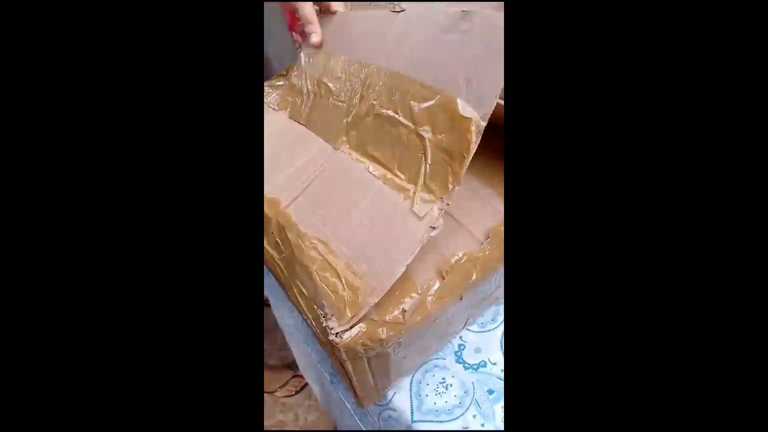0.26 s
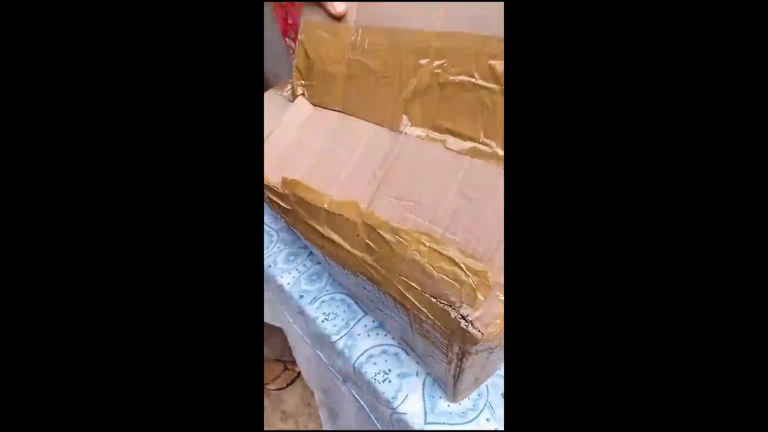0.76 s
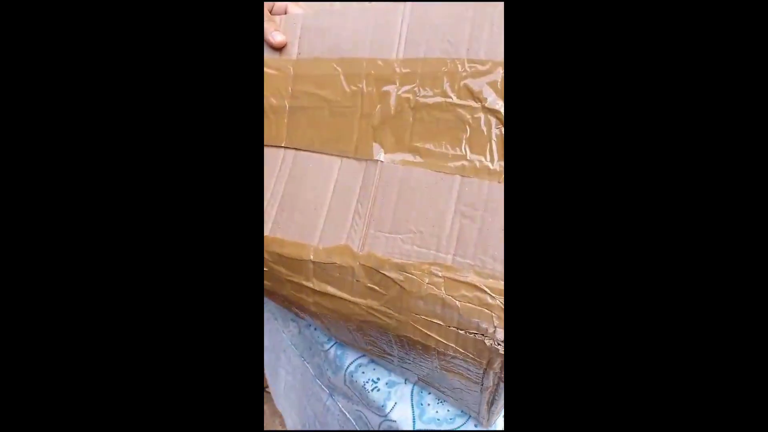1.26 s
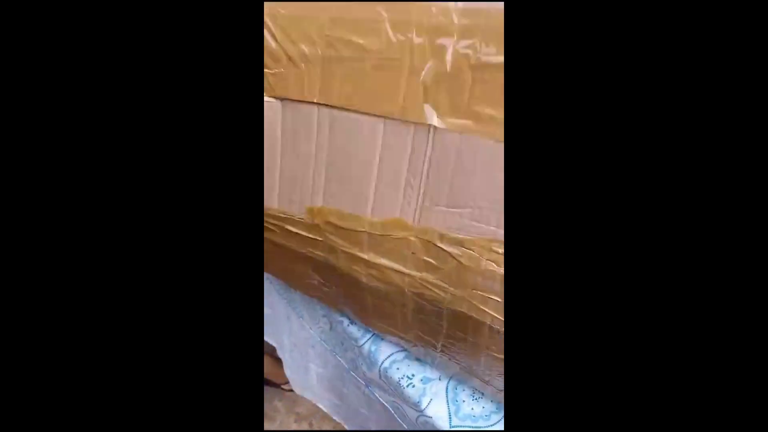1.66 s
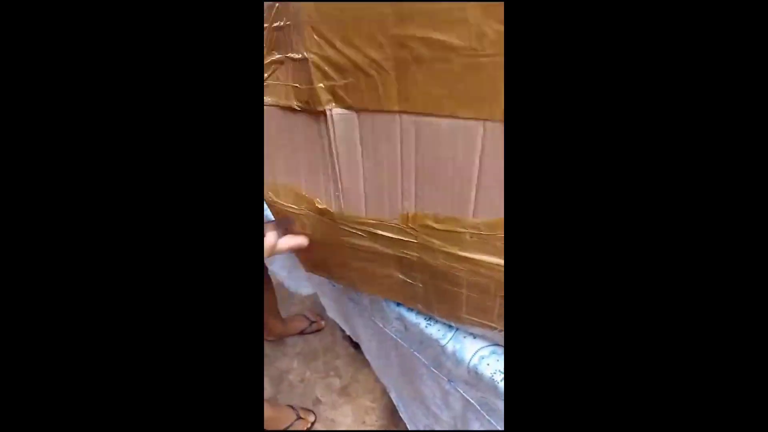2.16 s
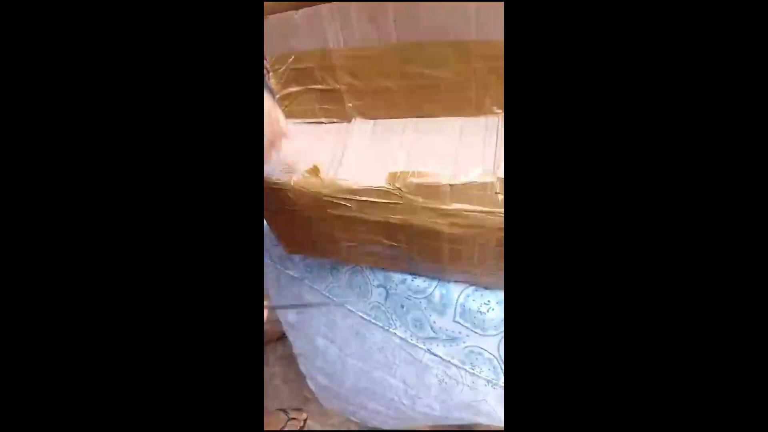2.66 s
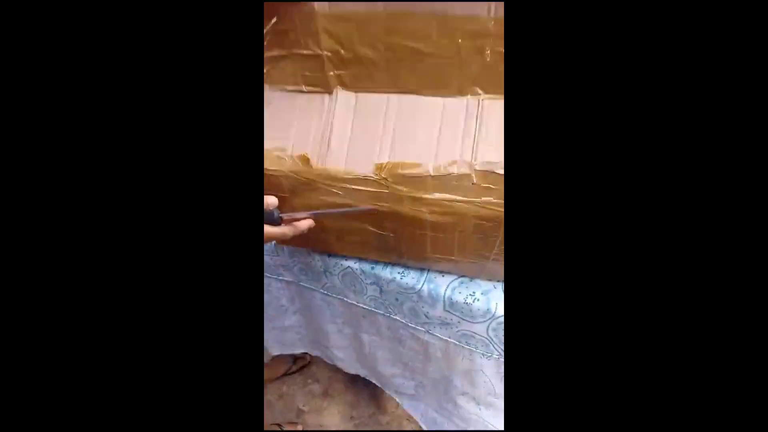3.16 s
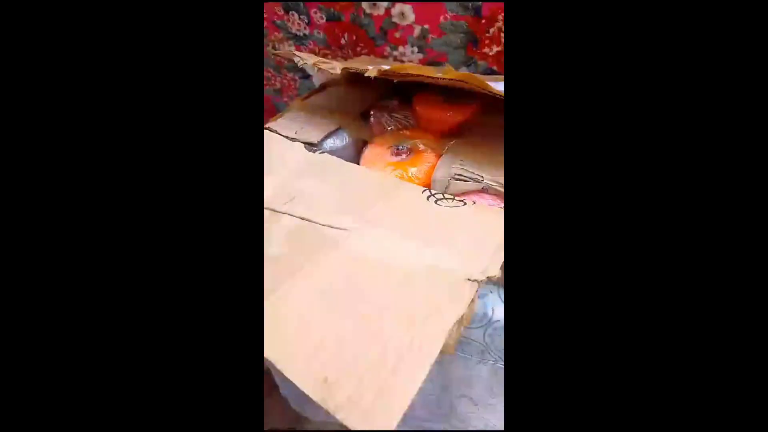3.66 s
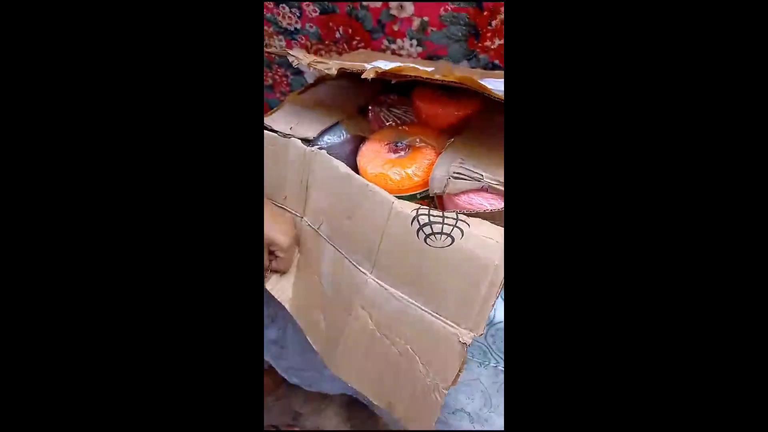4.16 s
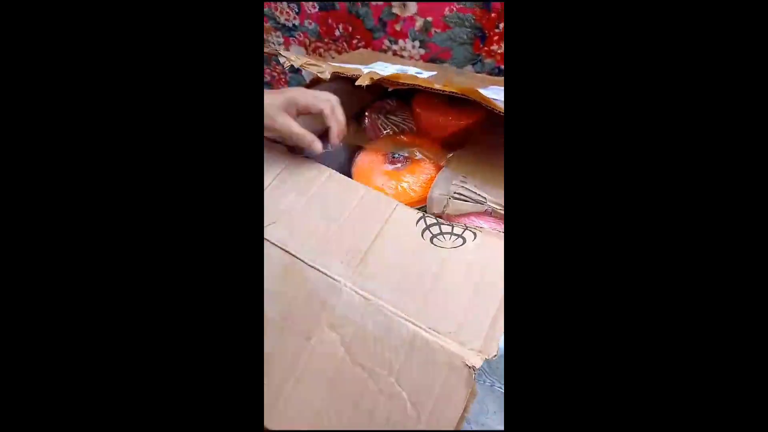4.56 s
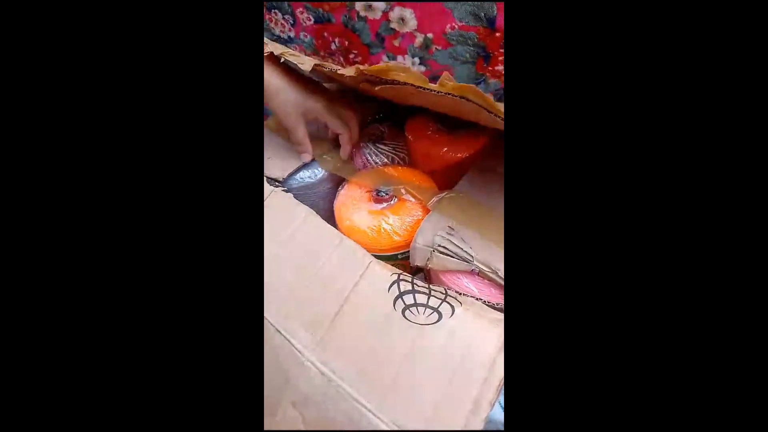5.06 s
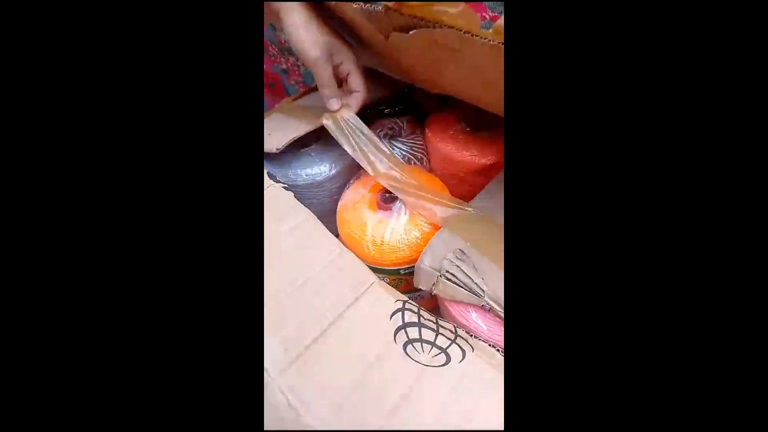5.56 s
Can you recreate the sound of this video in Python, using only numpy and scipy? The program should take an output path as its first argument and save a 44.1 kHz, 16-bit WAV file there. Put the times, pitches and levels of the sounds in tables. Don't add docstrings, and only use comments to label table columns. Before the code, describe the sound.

Close single microphone in a small furnished room: hands fold back taped cardboard flaps. Film hisses and crinkles at once, tape snaps sharply, and the hollow box knocks and rumbles on a table. After a quiet rub, another crackling burst comes, then lighter crinkles and bumps as the flaps open. Soft picking at plastic wrap leads to a loud, rapid rip of tape near the end.

```python
import sys
import numpy as np
from scipy import signal
from scipy.fft import rfft, irfft
from scipy.io import wavfile
from scipy.ndimage import uniform_filter1d

SR = 44100
rng = np.random.default_rng(int(sys.argv[2]) if len(sys.argv) > 2 else 0)


def boost_factor(decibels):
    exponent = np.asarray(decibels, float) / 20
    return 10 ** exponent


def to_wav(sig):
    pcm = np.clip(np.atleast_2d(sig), -1, 1) * 32767
    pcm = np.round(pcm).astype(np.int16)
    wavfile.write(sys.argv[1], SR, pcm.T)


N = 256216

# (frequency [Hz], density [dB per Hz])
HUSH = [(18, -45), (30, -20), (149, -29), (280, 16), (426, -5), (649, -5), (1910, 0), (8980, -19),
        (16000, -22)]
# (frequency [Hz], density [dB per Hz])
TABLE = [(15, -56.5), (25, -12.5), (59, -8), (102, 1.5), (150, -3), (200, -67.5), (330, -120)]
# (frequency [Hz], density [dB per Hz])
CARD = [(88, -68), (150, -18), (302, 4.5), (487, -1), (742, 1), (982, -3), (1150, -5.5), (1400, -17),
        (1820, -69), (3080, -120)]
# (frequency [Hz], density [dB per Hz])
TAPE = [(820, -51), (1400, -11.5), (1620, -9.5), (1970, -10), (2240, -5.5), (2730, -10.5), (2990, -5.5),
        (3470, -8), (3830, -2.5), (5170, -0.5), (5900, -2), (7670, -29.5), (13000, -120)]
# (frequency [Hz], density [dB per Hz])
FILM = [(3470, -44), (5900, -2), (6690, 7.5), (8520, 8.5), (11500, 2.5), (14900, 2), (16000, -4)]
# (frequency [Hz], density [dB per Hz])
CRUNCH = [(700, -30), (1300, -0.5), (2300, -1.5), (4000, -4.5), (6000, -7.5), (8500, -40)]
# (frequency [Hz], level [dB], t60 [s])
BOX = [(290, -12.5, 0.13), (541, -1.5, 0.033), (785, 4.5, 0.051), (1029, -15, 0.0099)]
# (time [s], length [s], extra shake [dB])
SHOVES = [
    (.47, 0.056, 21),
    (0.995, 0.26, 15.5),
    (1.46, 0.51, 9),
    (2.619, 0.12, 13.5),
    (3.08, 1, 10),
    (4.053, 0.085, 8),
    (4.284, 0.09, 11),
    (4.604, 0.17, 2.5),
]
# (time [s], length [s], peak level [dB])
SCRAPES = [
    (0.1, 0.25, -42),
    (0.607, .13, -35),
    (4.0, 0.1, -28.5),
    (1.7, 0.2, -36),
    (5.04, 0.4, -53),
]
# (time [s], length [s], peak level [dB], frequency [Hz])
SQUEAKS = [
    (.11, 0.077, -29.5, 2550),
    (.775, .035, -22.5, 9050),
    (0.927, .09, -49, 1580),
    (0.918, 0.089, -54, 2520),
    (1.973, 0.026, -21, 6500),
    (3.412, 0.094, -46, 1160),
]
# (time [s], peak level [dB], panel frequency [Hz], t60 [s])
KNOCKS = [(.046, -29.5, 740, 0.047), (.164, -24.5, 397, 0.022), (.212, -19, 350, 0.16),
          (0.23, -22, 295, 0.23), (0.244, -17.5, 339, 0.05), (0.467, -35.5, 316, 0.044),
          (.513, -20, 221, 0.024), (0.636, -23, 333, 0.043), (.744, -15, 570, 0.015),
          (1.772, -22, 696, .03), (2.396, -33, 500, 0.035), (3.148, -30.5, 290, 0.067),
          (3.682, -41, 910, 0.018), (4.958, -46, 359, 0.32), (5.152, -30.5, 695, .03),
          (5.21, -36.5, 640, .04), (1.008, -36, 281, 0.28), (1.574, -23.5, 392, 0.025),
          (1.788, -7, 613, 0.0044), (1.819, -16, 677, 0.048), (2.069, -24, 610, 0.036),
          (2.466, -35, 830, 0.058), (2.63, -28, 328, 0.029), (2.684, -16, 315, 0.063),
          (2.808, -30, 316, 0.038), (2.957, -27, 316, 0.014), (2.998, -31, 317, 0.027),
          (3.059, -37.5, 254, 0.13), (3.174, -30, 259.4, 0.15), (3.246, -24.5, 725, 0.025),
          (3.91, -23.5, 265, 0.041), (4.08, -13.5, 289, 0.004), (4.445, -25.5, 970, 0.031),
          (4.472, -25.5, 830, .025), (4.565, -21, 353, 0.055), (5.272, -34.5, 404, .075),
          (5.658, -22, 437, 0.036), (5.692, -17.5, 353, 0.046)]
# (peak time [s], film level [dB], rise [s], fall [s], weight on the card
# [dB])
STROKES = [(0, -17.5, .1, 0.068, -5.5), (0.07, -34, 0.0058, 0.085, -6), (0.124, -23.5, 0.025, 0.21, -16),
           (0.226, -24.5, 0.11, 0.13, -6), (.4, -64, 0.5, 0.11, 5.5), (.55, -34.5, 0.068, 0.067, -6),
           (0.66, -36, 0.12, 0.45, -4.5), (0.749, -29, 0.42, 0.081, -6.5), (.81, -32, 0.22, 0.046, -28),
           (.87, -66, 0.076, 0.16, -19), (1.021, -48, 0.019, 0.18, 4.5), (1.25, -58, 0.23, 0.28, -4),
           (1.46, -59.5, 0.16, .1, -4), (1.48, -46, .012, 0.046, -9), (1.51, -30, 0.021, 0.091, -1),
           (1.585, -25.5, 0.027, 0.039, -3.5), (1.648, -34, 0.07, 0.09, 0), (1.8, -29.5, 0.052, 0.21, 3),
           (1.867, -33, 0.12, 0.19, -2.5), (2.068, -39, 0.16, .13, -1), (2.3, -48.5, .012, .08, -10),
           (2.37, -39.5, 0.035, 0.31, -11), (2.481, -28.5, 0.14, 0.16, -13.5),
           (2.578, -35, 0.2, 0.036, -10.5), (2.636, -32.5, 0.028, 0.064, -7),
           (2.692, -36, 0.013, 0.16, -3.5), (2.977, -43.5, 0.017, 0.074, -1.5),
           (3.026, -35.5, 0.046, 0.093, -12.5), (3.06, -41, .1, 0.017, -22),
           (3.185, -31, 0.083, 0.11, -15), (3.314, -39.5, 0.027, 1, -6), (3.45, -51, 0.54, 0.3, 6.5),
           (3.543, -28, 0.063, 0.071, -9.5), (3.638, -54, .1, 0.08, -30.5),
           (3.68, -31.5, 0.015, 0.033, -19), (3.836, -41, 0.11, 0.078, -3), (3.901, -33.5, 0.011, 0.11, -2),
           (4.087, -36, 0.23, 0.14, 3), (4.21, -40, 0.03, 0.082, -10), (4.35, -63, .1, .1, -4),
           (4.451, -32, 0.038, 0.041, 0.5), (4.5, -54, 0.12, 0.21, 13), (4.56, -40, 0.12, 0.27, -6.5),
           (4.77, -43, 0.039, 0.38, -27), (4.856, -38, 0.092, 0.023, -20.5), (4.97, -37, 0.16, 0.17, -19.5),
           (5.07, -31.5, 0.033, 0.14, -20.5), (5.114, -38, 0.019, 0.053, -8.5),
           (5.15, -29, 0.19, 0.23, -17.5), (5.3, -34.5, 0.16, 0.052, -10.5), (5.335, -40, 0.11, 0.016, -5),
           (5.42, -45, 0.14, 0.12, 0), (5.544, -14, 0.027, 0.054, -12.5), (5.63, -20.5, 0.1, 0.12, -3),
           (5.692, -24.5, 0.09, 0.074, -4.5), (5.81, -34, 0.13, 0.084, -12)]
# (time [s], tape scrape against film [dB], its lower half [dB], boom of the box [dB])
STICKY = [(0, -17.5, 11.5, -8.5), (.1, -10, 9, -4), (.22, -12, 8, 2.5), (.45, -6.5, 13.5, 4.5),
          (.6, -5.5, 6.5, 3), (1.9, -8, 15.5, -0.5), (2.301, -11, 4.5, 0.5), (3.2, -10.5, -2, 9),
          (3.35, -12, 0, -5.5), (3.75, -7.5, -14, -13), (4.2, -8.5, 14, -5.5), (4.7, -16.5, 5.5, -6),
          (4.86, -9.5, -4, -3.5), (5.15, -21.5, 5.5, 7.5), (5.45, -13.5, 2.5, -11.5), (5.55, -9, 5, -20),
          (5.81, -2.5, 3, 12.5)]
# (time [s], crinkle share [0-1])
GRAIN = [(0, .2), (.35, .15), (.5, .35), (3.2, .35), (3.3, .55), (3.95, .55), (4.05, .35), (4.75, .28),
         (5.33, .28), (5.4, .5)]
# (time [s], length [s], peak level [dB])
TEARS = [(.001, 0.022, -10.5), (0.728, 0.025, -6), (1.501, 0.0085, -18), (1.572, 0.0084, -27),
         (1.782, 0.014, -17), (1.848, 0.02, -7.5), (3.901, 0.017, -15), (5.57, 0.0069, -15),
         (5.573, 0.004, 0), (5.5356, 0.012, -1.5), (5.554, 0.013, 1), (5.603, 0.0041, 5.5),
         (5.625, 0.037, -2), (5.661, 0.0061, -1), (5.679, 0.019, 0.5), (5.701, 0.0045, -4),
         (5.717, .006, 1), (5.741, 0.0095, -12.5), (5.793, 0.0023, 5.5)]
# (time [s], peak level [dB], lower crunch peak level [dB])
SNAPS = [(0.3929, -17.5, -26.5), (0.5108, -17, -18), (0.5424, -11, -38), (0.558, -10, -42),
         (.5841, -5.5, -35), (.6024, -13, -51), (0.6997, -15, -13), (0.721, 3.5, -19), (0.7294, 1.5, -25),
         (0.7316, -17, -2.5), (.7485, -23, -3.5), (1.1999, -33, -51), (1.2796, -28, -56), (1.498, -2.5, -5),
         (1.5156, -16.5, -35), (1.577, -15.5, -7.5), (1.5813, -12, -28), (1.6482, -11.5, -16),
         (1.6919, -12, -23.5), (1.7888, 0.5, 0), (1.792, -8, 5.5), (1.8526, 4.5, -3.5), (1.899, -19, -44),
         (1.9845, -19.5, -19.5), (2.032, -14.5, -23.5), (2.4401, -9.5, -15.5), (2.6975, -12, -22),
         (3.0023, -11, -21.5), (3.2453, -14.5, -28.5), (3.836, -14, -30), (4.0792, -7.5, -14.5),
         (4.2021, -6, -27.5)]
# (time [s], peak level [dB], lower crunch peak level [dB])
RIP = [(5.404, -21, -34), (5.416, -3, -21), (5.5088, -2.5, -26), (5.5221, 1, -30), (5.532, -1, -23),
       (5.545, -4, -25), (5.554, 18, -12.5), (5.561, -12.5, -12), (5.5687, -10, -4.5), (5.5764, -20, -24),
       (5.6042, -7, -6), (5.6202, -1, -4.5), (5.625, -2, -30), (5.6136, -12, -39), (5.6391, 1, -2.5),
       (5.6624, -22, -6), (5.6751, 1.5, -23), (5.682, -6, -21), (5.691, 0.5, -26), (5.703, 1.5, -18),
       (5.718, 3, -11), (5.732, -6, -15), (5.737, -5.5, -34), (5.7414, -12, -26), (5.792, 4, -7.5)]
# (time [s], peak level [dB], patch frequency [Hz])
POPS = [(0.0681, -23, 10200), (0.0845, -19, 10400), (0.2898, -23, 12500), (0.3986, -24, 9500),
        (0.4388, -41, 9400), (0.523, -18.5, 9400), (0.5648, -18.5, 7900), (0.6135, -15, 8450),
        (0.7482, -4, 7250), (0.857, -33, 10800), (0.9005, -26, 10100), (0.9597, -36, 11700),
        (1.0691, -31, 10070), (1.1191, -43, 8200), (1.2355, -35, 11300), (1.2505, -30, 9250),
        (1.2738, -42, 8100), (1.313, -37, 8600), (1.3794, -40, 8650), (1.3872, -38, 8100),
        (1.4357, -40, 9100), (1.4601, -40, 7700), (1.4776, -34, 8500), (1.5478, -15, 9700),
        (1.672, -21.5, 8700), (1.716, -25, 7900), (1.7268, -25, 11400), (1.7718, -15.5, 9600),
        (1.7953, -2, 8340), (1.855, -11, 12800), (1.8903, -22, 9300), (1.8947, -10, 9100),
        (1.9194, -23, 10400), (1.9522, -16, 9350), (1.9574, -29, 10400), (2.0235, -25, 10200),
        (2.094, -27, 11400), (2.1207, -21, 8500), (2.125, -27, 9000), (2.1447, -35, 9100),
        (2.1674, -38, 11100), (2.1883, -38, 7870), (2.291, -42, 11230), (2.3017, -40, 8600),
        (2.3074, -29.5, 9500), (2.325, -35, 10500), (2.3293, -39, 9300), (2.4676, -22, 11500),
        (2.4706, -19.5, 10600), (2.4822, -25, 11000), (2.4918, -9, 8900), (2.503, -20, 8300),
        (2.5075, -10.5, 10000), (2.5136, -18, 9400), (2.528, -14, 10800), (2.5348, -11, 10500),
              (2.5433, -18, 10300), (2.5481, -9.5, 10500), (2.5532, -13, 11300), (2.5762, -16, 8500),
              (2.579, -22, 8200), (2.5882, -18, 7200), (2.6119, -22, 10200), (2.6163, -16, 8300),
              (2.6379, -19, 11500), (2.643, -16, 11000), (2.6489, -24, 9000), (2.6547, -22, 8100),
              (2.6932, -12.5, 10500), (2.7143, -30, 9400), (2.7203, -31, 8000), (2.7322, -21.5, 10100),
              (2.7827, -21, 7500), (2.7925, -32, 8800), (2.81, -36, 8300), (2.8607, -34, 10100),
              (2.865, -34, 11340), (2.928, -35, 10600), (2.9327, -38, 10500), (2.958, -25, 7000),
              (2.9749, -30, 10100), (3.1096, -19, 8600), (3.225, -23, 8700), (3.2767, -30, 9100),
              (3.2926, -21.5, 7450), (3.3573, -18.5, 9100), (3.3661, -20, 12100), (3.3822, -23, 8600),
              (3.397, -18.5, 9350), (3.4142, -30, 13300), (3.4249, -29, 13000), (3.4283, -23, 9300),
              (3.4458, -30, 11200), (3.4742, -33, 8600), (3.4901, -28, 9700), (3.4971, -23, 11600),
              (3.5187, -13, 12700), (3.5356, -20, 10500), (3.5504, -13, 11100), (3.567, -10.5, 10100),
              (3.576, -25, 10300), (3.5896, -19, 12700), (3.5964, -29, 9400), (3.5998, -25, 10500),
        (3.6141, -42, 9000), (3.6245, -22, 10700), (3.6319, -23, 8800), (3.636, -19, 8700),
             (3.6547, -24, 12700), (3.6735, -18, 9000), (3.6804, -24, 9550), (3.684, -21, 12000),
             (3.6883, -24, 10900), (3.694, -20, 9100), (3.706, -23, 8100), (3.721, -21.5, 11500),
             (3.745, -19, 9150), (3.7785, -27, 11300), (3.799, -22, 13800), (3.8035, -30, 8900),
             (3.8198, -23, 8000), (3.8234, -24, 9200), (3.8677, -27, 8100), (3.8806, -36, 8400),
             (3.8853, -32, 9100), (3.8975, -12, 9900), (3.9027, -4, 9800), (3.9066, -14, 8900),
             (3.9378, -23, 7700), (3.9603, -21, 10100), (3.964, -19, 8650), (4.013, -20, 13100),
             (4.1129, -19, 9300), (4.1658, -24, 8800), (4.2068, -23, 9700), (4.271, -30.5, 9200),
             (4.3008, -31.5, 9600), (4.3418, -39, 11800), (4.3499, -40, 13100), (4.3683, -41.5, 13700),
             (4.4456, -15.5, 8750), (4.474, -23, 8100), (4.4867, -25, 10900), (4.5115, -39, 9600),
             (4.5229, -33, 10300), (4.5458, -16.5, 11200), (4.5556, -24, 11900), (4.5676, -20, 9700),
             (4.608, -27, 8000), (4.7205, -36, 11600), (5.2117, -28, 7340), (5.3693, -38, 8800),
             (5.3751, -33, 11700), (5.386, -29, 11000), (5.419, -14, 10000), (5.4912, -31, 9700)]


def colour(x, spectrum):
    hz, db = np.transpose(spectrum)
    bins_hz = np.arange(1025) * SR / 2048
    curve_db = np.interp(np.log(bins_hz + 1), np.log(hz), db)
    cepstrum = irfft(np.log(boost_factor(curve_db)))
    cepstrum[1:1024] *= 2
    cepstrum[1025:] = 0
    response = irfft(np.exp(rfft(cepstrum)))
    return signal.fftconvolve(x, response / np.sqrt(np.sum(response ** 2)))[:len(x)]


def tilt(x, hz, low_db):
    low = signal.sosfiltfilt(signal.butter(2, hz, fs=SR, output="sos"), x)
    return x + (boost_factor(low_db) - 1) * low


def add(out, s, x, db):
    i = int(s * SR)
    out[i:i + len(x)] += (x * boost_factor(db) / np.max(np.abs(x)))[:N - i]


def ring(t, hz, t60):
    return np.sin(2 * np.pi * hz * t) * np.exp(-np.log(1000) * t / max(t60, .002))


def unit(x):
    return x / np.sqrt(np.sum(x ** 2))


def walk(rate):
    k = int(SR / rate)
    return uniform_filter1d(np.repeat(rng.standard_normal(N // k + 1), k), k)[:N]


def grit(per_s, scatter_db, smear_s, share):
    size_db = scatter_db * np.minimum(rng.exponential(size=N), np.e)
    slips = (rng.random(N) < per_s / SR) * boost_factor(size_db)
    puffs = signal.lfilter([1], [1, -np.exp(-1 / (smear_s * SR))], slips)
    puffs /= np.sqrt(np.mean(puffs ** 2))
    share = np.clip(share, 0, 1)
    return (1 - share + share * puffs) / np.sqrt(1 - share * (1 - share))


def grip(x, share, hold_s=0.309, spread_s=0.0029):
    hop, t, out = int(hold_s * SR), np.arange(256) / SR, np.zeros(N)
    for start in range(-hop, N, hop):
        echoes = share * unit(rng.standard_normal(len(t)) * np.exp(-t / spread_s))
        echoes[0] = 1
        a, b = max(start, 0), min(start + 2 * hop, N)
        held = x[a:b] * np.hanning(2 * hop)[a - start:b - start]
        out[a:b + 255] += signal.fftconvolve(held, echoes)[:N - a] / np.sqrt(1 + share ** 2)
    return out


def hush():
    return boost_factor(-71.5) * colour(rng.standard_normal(N), HUSH)


def room(x):
    t60_s, tail_db = .18, -21
    t = np.arange(int(.4 * SR)) / SR
    tail = rng.standard_normal(len(t)) * np.exp(-np.log(1000) * t / t60_s) * (t > .003)
    return x + boost_factor(tail_db) * signal.fftconvolve(x, unit(tail))[:N]


def table_rumble(now, card_db):
    shove_db = sum(db * np.sin(np.pi * np.clip((now - a) / length, 0, 1)) ** .5 for a, length, db in SHOVES)
    shake_db = -52.0 + 0.39 * card_db + shove_db
    return colour(rng.standard_normal(N), TABLE) * boost_factor(shake_db + 2.7 * walk(22))


def card_rub(card_db, boom_db):
    lumps = grit(170, 10.0, 0.0047, 0.33) * rng.standard_normal(N)
    card = colour(lumps, CARD) * boost_factor(card_db + 1.6 * walk(40))
    return tilt(card, 830, boom_db)


def scrapes():
    out = np.zeros(N)
    drag = grit(700, 7, 0.002, 0.6) * rng.standard_normal(N)
    drag = colour(drag, [(800, -34), (1500, 4.5), (2400, -9.0), (3500, -33.5)])
    for s, length, db in SCRAPES:
        count = int(length * SR)
        add(out, s, drag[int(s * SR):][:count] * np.hanning(count), db)
    return out


def squeaks():
    out, t = np.zeros(N), np.arange(882) / SR
    for s, length, db, hz in SQUEAKS:
        count = int(length * SR)
        note = signal.fftconvolve(rng.standard_normal(4410), ring(t, hz, 30 / hz))[882:]
        add(out, s, note[:count] * np.hanning(count) ** .5, db)
    return out


def knocks():
    out, t = np.zeros(N), np.arange(int(.15 * SR)) / SR
    thumps = [(s, db - 9.5, 679 * (0.835 + 0.37 * rng.random()), 0.0096) for s, _, db in SNAPS + RIP]
    for s, db, hz, t60 in KNOCKS + thumps:
        box = np.zeros(len(t))
        for mode_hz, mode_db, mode_t60 in BOX:
            luck_db, detune = 4.0 * rng.standard_normal(), .06 * rng.standard_normal()
            box += boost_factor(mode_db + luck_db) * ring(t, mode_hz * (1 + detune), mode_t60)
        push = (1 + 1.5 * rng.standard_normal(len(t))) * t * np.exp(-t / 0.00015)
        body = ring(t, hz, t60) + boost_factor(-19.0) * box
        blow = signal.fftconvolve(push, body)[:len(t)]
        add(out, s, colour(blow, [(60, -57.0), (200, -6.5), (1200, 5.5), (2200, -34)]), db)
    return out


def strokes():
    curve, card_steeper, rest_db = 0.96, 1.23, -80
    now = np.arange(0, N, 64) / SR
    film = card = boost_factor(2 * rest_db)
    for s, db, rise, fall, weight_db in STROKES:
        span = np.where(now < s, rise, fall)
        drop_db = np.minimum(20 * (np.abs(now - s) / span) ** curve, 200)
        film = film + boost_factor(2 * (db - drop_db))
        card = card + boost_factor(2 * (db + weight_db - card_steeper * drop_db))
    return [np.interp(np.arange(N) / SR, now, 10 * np.log10(power)) for power in (film, card)]


def film_and_tape(now, film_db, scrape_db, low_db):
    share = np.interp(now, *np.transpose(GRAIN))
    crinkle = grit(1000, 10.0, 0.0012, share) * boost_factor(6 * share * walk(40))
    film = colour(crinkle * rng.standard_normal(N), FILM) * boost_factor(np.minimum(film_db, -27))
    tape = tilt(colour(crinkle * rng.standard_normal(N), TAPE), 2300, low_db)
    tape *= boost_factor(np.minimum(film_db + scrape_db, -33))
    return grip(film, .4) + grip(tape, 1.1)


def rubbing():
    now = np.arange(N) / SR
    film_db, card_db = strokes()
    s, *held = np.transpose(STICKY)
    scrape_db, low_db, boom_db = (np.interp(now, s, column) for column in held)
    below = table_rumble(now, card_db) + card_rub(card_db, boom_db)
    return below + film_and_tape(now, film_db, scrape_db, low_db)


def tears():
    out = np.zeros(N)
    rasp = grit(1200, 3.5, .0006, .6) * rng.standard_normal(N)
    rasp = colour(rasp, FILM) + boost_factor(-8.0) * colour(rasp, TAPE)
    for s, length, db in TEARS:
        t = np.arange(int(length * SR)) / SR
        add(out, s, rasp[int(s * SR):][:len(t)] * np.exp(-.6 * t / length), db)
    return out


def releases():
    glue = [(s, db, crunch_db, 6500 + 5000 * rng.random()) for s, db, crunch_db in SNAPS + RIP]
    return glue + [(s, db, db - 65, hz) for s, db, hz in POPS]


def cracks():
    out, t = np.zeros(N), np.arange(int(.03 * SR)) / SR
    click = 1. * (t == 0)
    film, crunch = colour(click, FILM), colour(click, CRUNCH)
    for s, db, crunch_db, hz in releases():
        snap = t / .0002 * np.exp(-t / .0002)
        rustle = boost_factor(-26) * np.exp(-t / .003)
        burst = rng.standard_normal(len(t)) * (snap + rustle)
        patch = unit(ring(t[:200], hz, 0.007))
        bright = np.convolve(burst, film)[:len(t)] + 0.67 * np.convolve(burst, patch)[:len(t)]
        add(out, s, bright, db + 0.036)
        add(out, s, np.convolve(burst, crunch)[:len(t)], crunch_db - 6.0)
    return out


def scene():
    parcel = scrapes() + squeaks() + knocks() + rubbing() + tears() + cracks()
    mono = hush() + room(parcel)
    return np.array([mono, mono])


def band_limit(x):
    return signal.sosfilt(signal.butter(12, 16820, fs=SR, output="sos"), x)


def record(dry):
    top_cut = signal.ellip(7, .3, 42, 15450, fs=SR, output="sos")
    mix = .9 * np.tanh(signal.sosfilt(top_cut, dry) / .9)
    return band_limit(mix)


dry = scene()
out = record(dry)
to_wav(out)
```